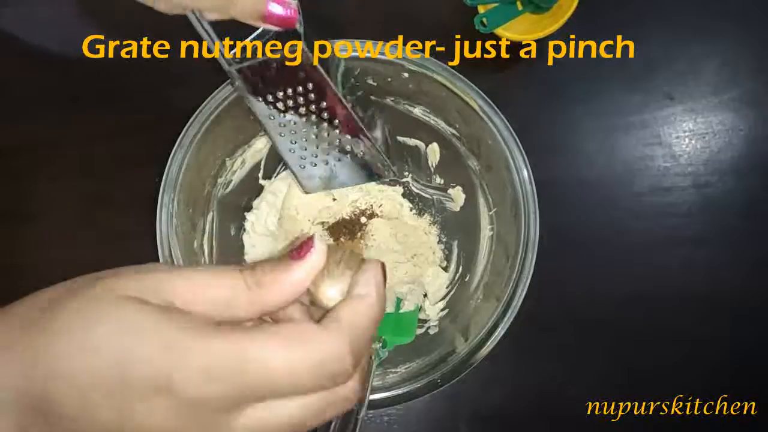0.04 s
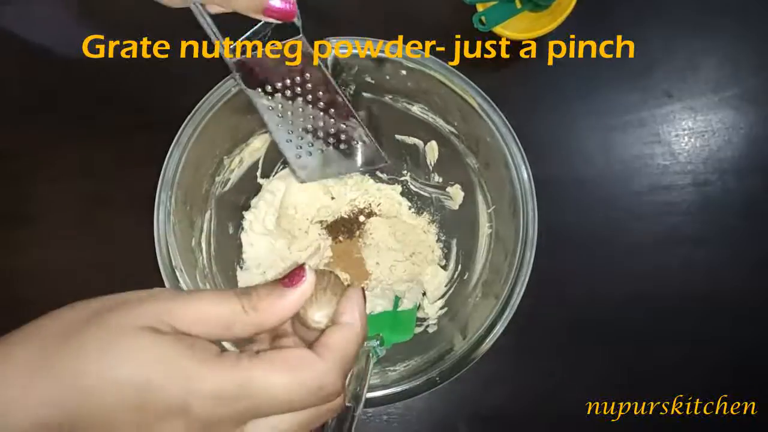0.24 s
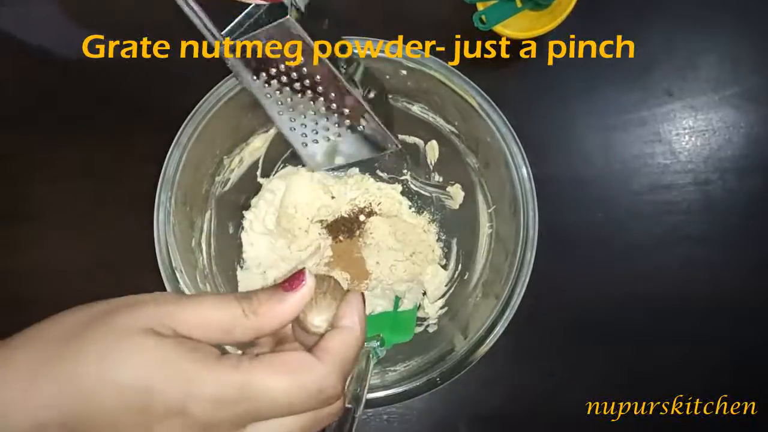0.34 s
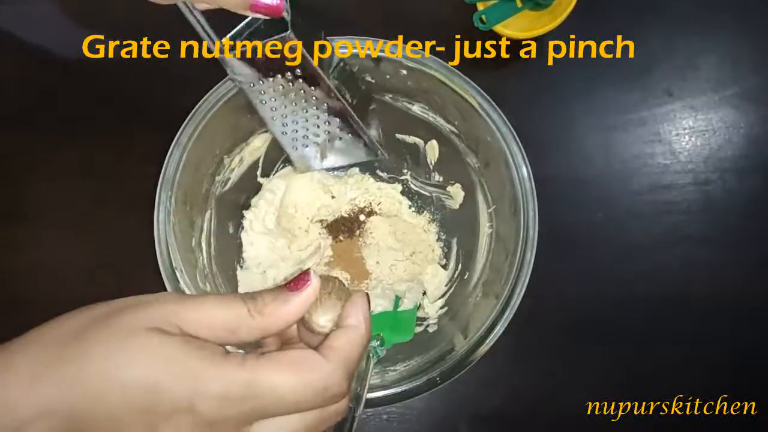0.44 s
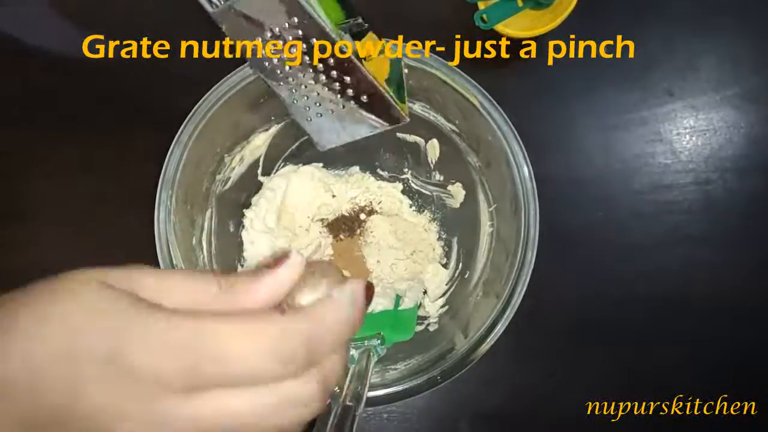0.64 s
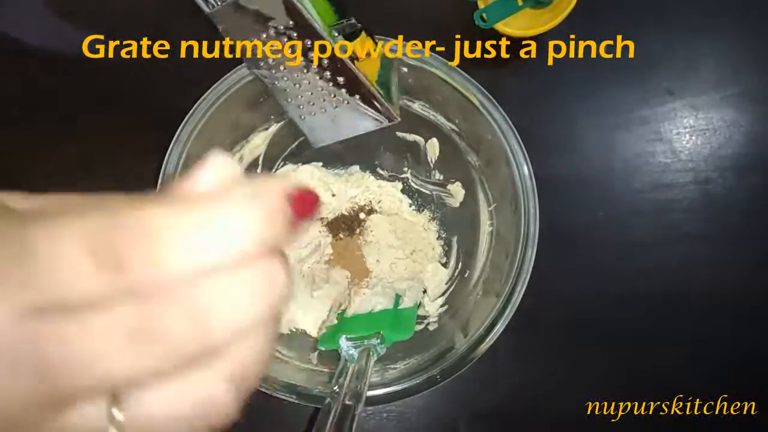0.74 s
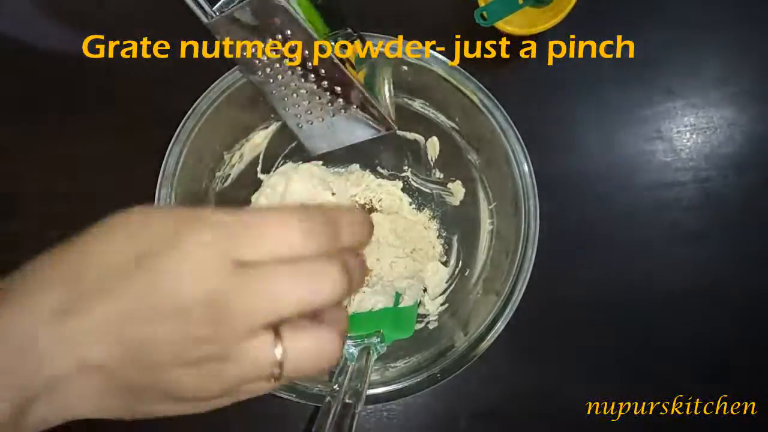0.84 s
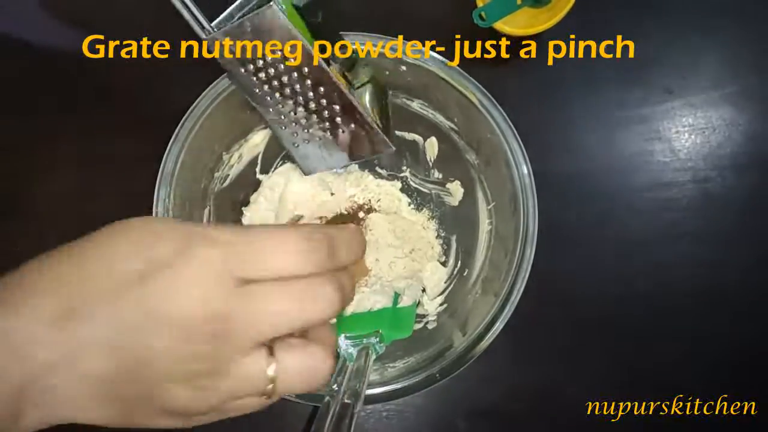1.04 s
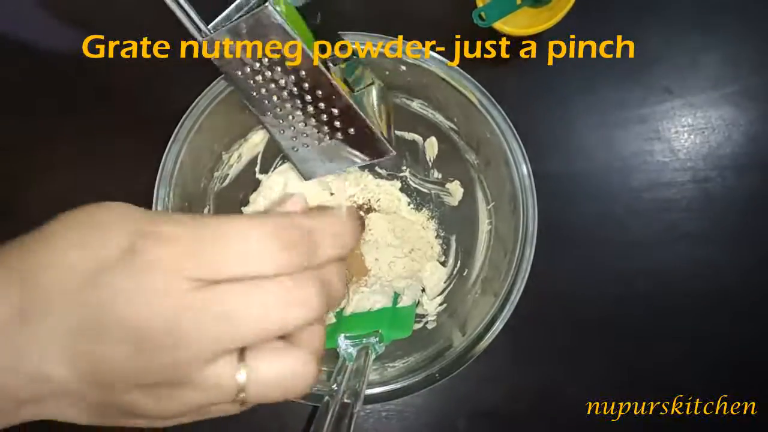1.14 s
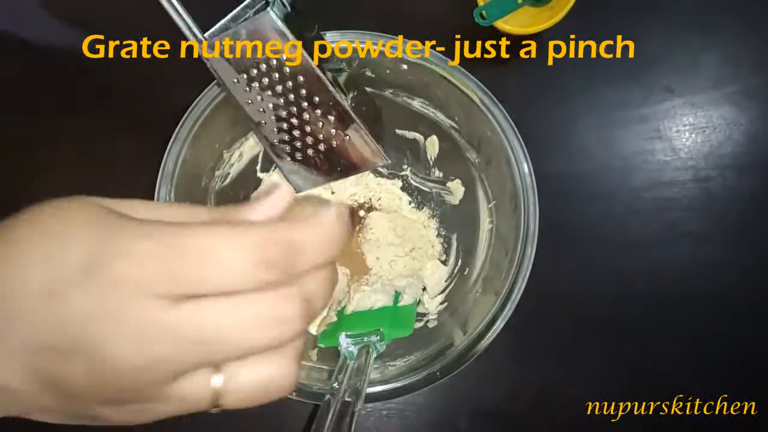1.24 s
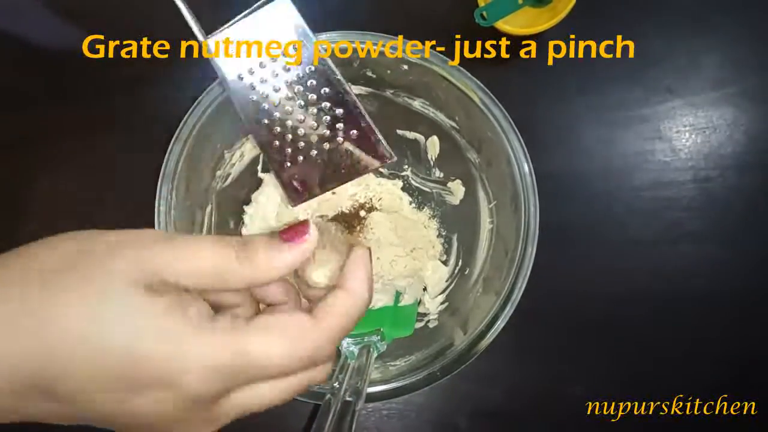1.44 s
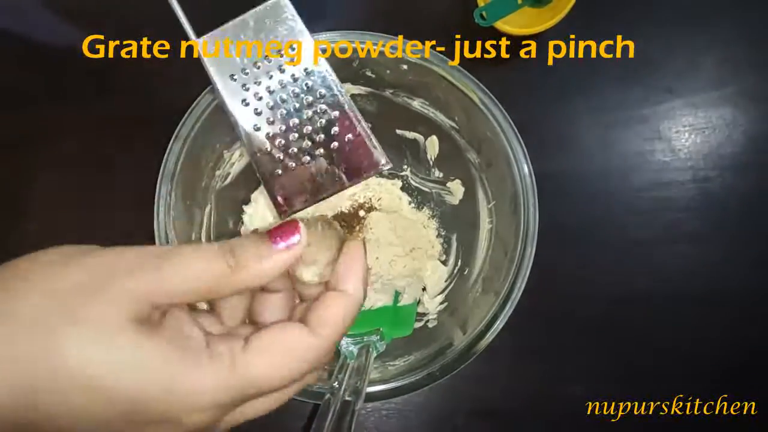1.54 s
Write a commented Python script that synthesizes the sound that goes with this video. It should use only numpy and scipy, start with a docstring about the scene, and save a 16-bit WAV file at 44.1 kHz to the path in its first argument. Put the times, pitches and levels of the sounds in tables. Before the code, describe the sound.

A metal hand grater clinks loudly against a glass bowl rim, which rocks with dull thuds

```python
"""Low rumble, hum and a thin whine run throughout. A steel hand grater taps the rim of a glass mixing
bowl twice, each tap with a quick rebound: noise crack, brief steel modes, longer glass modes, short thump.
The bowl rocks on the table in dull thuds of low modes and scuff noise. A small kitchen answers, mostly
from the left, by one echo and a decaying noise tail. Last, faint rustles: short swells of grainy noise."""
import sys
import numpy as np
from scipy import signal
from scipy.fft import rfft, irfft, next_fast_len
from scipy.io import wavfile
from scipy.ndimage import uniform_filter1d, map_coordinates

SR = 44100
rng = np.random.default_rng(int(sys.argv[2]) if len(sys.argv) > 2 else 0)


def unload_wav(signal):
    """Save mono or channel-first audio to the path in sys.argv[1] as 16-bit WAV at rate SR, clipped to [-1, 1]."""
    wavfile.write(
        sys.argv[1],
        SR,
        np.round(np.clip(np.atleast_2d(signal).T, -1, 1) * 32767).astype(np.int16),
    )


N = 70560  # samples, 1.6 s
LEFT_RIGHT = np.array([[1], [-1]])


def amp(db):
    """Decibels to gain."""
    return 10 ** (np.asarray(db) / 20)


def unit(x):
    """Scales to rms 1."""
    return x / np.sqrt(np.mean(x ** 2) + 1e-20)


def along(points, hz):
    """Interpolates (f/Hz, value) points on a log frequency axis."""
    f, v = np.transpose(points)
    return np.interp(np.log(hz + 1), np.log(f + 1), v)


def leftward(db):
    """Gains of left and right: +db and -db."""
    return amp(LEFT_RIGHT * db)


def since(s):
    """Seconds after time s, zero before it."""
    return np.maximum(np.arange(N) / SR - s, 0)


def filtered(x, response):
    """Multiplies the spectrum of x by a response of frequency."""
    m = next_fast_len(N + SR // 2)
    spectrum = rfft(x, m) * response(np.fft.rfftfreq(m, 1 / SR))
    return irfft(spectrum, m)[..., :N]


def noise(colour, alike):
    """Stereo noise of rms 1; the mid/side balance sets the left-right correlation."""
    def mid_side_gains(hz):
        angle = np.arccos(np.clip(along(alike, hz), -1, 1)) / 2
        return amp(along(colour, hz)) * [np.cos(angle), np.sin(angle)]

    mid, side = filtered(rng.standard_normal((2, N)), mid_side_gains)
    return unit(np.array([mid + side, mid - side]))


# steady noise colour: f/Hz, relative density/dB per Hz
AIR_COLOUR = [(13, -30), (22, 2.5), (54, -0.5), (75, -16.5), (108, -3.5), (123, -10.5), (157, -8),
              (834, -31), (2230, -31), (3590, -38), (4100, -40), (4560, -41.5), (12500, -43.5),
              (16200, -71), (22000, -120)]
# its left-right correlation: f/Hz, correlation
AIR_ALIKE = [(100, 0.99), (400, .85), (1200, 0.13), (8000, 0.04)]
# background lean: f/Hz, level to left/dB (right gets the negative)
AIR_LEFT = [(50, 1.9), (200, 0), (1000, 2), (5000, 5.5), (12000, 0.5)]
# hum and whine before the lean: f/Hz, rms level/dB
HUM = [(49, -63.5), (101, -69.5), (151, -63), (4016, -76), (4317, -83.5)]
AIR_DB = -50  # before the lean


def background():
    """Coloured noise for rumble and hiss; steady sines for mains hum and a thin electrical whine."""
    hum = 0
    for hz, rms_db in HUM:
        turns = hz * since(0) + rng.random()
        hum = hum + np.sqrt(2) * amp(rms_db) * np.sin(2 * np.pi * turns)
    air = amp(AIR_DB) * noise(AIR_COLOUR, AIR_ALIKE)
    return filtered(air + hum, lambda hz: leftward(along(AIR_LEFT, hz)))


BUILD_S = 0.0009  # rise time constant


def burst(s, t60):
    """Envelope: quick exponential rise at time s, exponential fall by 60 dB in t60 seconds."""
    t = since(s)
    return amp(-60 * t / t60) * (1 - np.exp(-t / BUILD_S))


# noise crack of a contact: f/Hz, relative density/dB per Hz
CRACK_COLOUR = [(100, -4), (600, -9.5), (1500, -1), (2800, 4.5), (5200, -2.5), (5700, -7.5), (6150, 2.5),
                (6550, -10), (7000, -3), (7850, -10.5), (8500, -2.5), (10000, -4), (10900, -8),
                (11700, -5.5), (13000, -8.5)]
# left-right correlation of cracks, scuffs and rustles: f/Hz, correlation
CONTACT_ALIKE = [(300, .95), (1000, -0.42), (2000, -0.58), (10000, 0.12)]
CRACK_T60_S, SIZZLE_T60_S, SIZZLE_DB = 0.05, 0.27, -15.5  # sizzle relative to crack


def crack(s):
    """Contact noise: a sharp burst over a weaker, longer sizzle."""
    envelope = burst(s, CRACK_T60_S) + amp(SIZZLE_DB) * burst(s, SIZZLE_T60_S)
    return envelope * noise(CRACK_COLOUR, CONTACT_ALIKE)


SHIMMER_DEPTH, SHIMMER_KNOTS_PER_S, SHIMMER_GROW_S = 0.6, 130, 0.02
SCATTER_DB = 2.47  # standard deviation of a mode's level from strike to strike


def wobble(knots_per_s):
    """Smooth random curve through normally distributed knots."""
    return map_coordinates(rng.standard_normal(2000), [np.arange(N) * knots_per_s / SR])


def ring(modes, s, spot, pitch=1):
    """Damped modes struck at time s; random amplitude and phase flutter sets in as they decay."""
    t = since(s)
    depth = SHIMMER_DEPTH * (1 - np.exp(-t / SHIMMER_GROW_S))
    waves = 0
    for hz, db, t60, spot_db in modes:
        phase = 2 * np.pi * hz * pitch * t
        in_phase = (1 + depth * wobble(SHIMMER_KNOTS_PER_S)) * np.sin(phase)
        quadrature = depth * wobble(SHIMMER_KNOTS_PER_S) * np.cos(phase)
        strike_db = db + spot * spot_db + SCATTER_DB * rng.standard_normal()
        waves = waves + amp(strike_db) * burst(s, t60) * (in_phase + quadrature)
    return waves


# grater modes at spot 0, damped by the hand: f/Hz, mean level/dB, t60/s, gain from spot 0 to 1/dB
STEEL_MODES = [(219, -12.5, 0.16, 3.5), (364, -9.5, 0.15, -7.5), (530.6, -22, 0.16, 6.5),
               (709.3, -7, 0.11, -3), (779, -14.5, .09, 3.5), (1120, -3.5, .11, -1.5), (1697, -9, .08, -1),
               (1907, -16.5, 0.04, -10), (2455, -11.5, 0.043, 1.5), (2637, -1.5, 0.081, 3.5),
               (2662, 3, .09, -9), (3560, -5.5, 0.085, 3), (4090, -18, 0.14, 10), (4840, -8, 0.097, 10),
               (6100, -11, .1, 4), (11770, -9, 0.083, 4.5)]
STEEL_PITCH_SHIFT = -0.012  # share, from spot 0 to spot 1


def steel_sheet(s, spot):
    """Clank of the hand-held sheet; the contact spot shifts mode levels and pitch."""
    return ring(STEEL_MODES, s, spot, 1 + STEEL_PITCH_SHIFT * spot)


# bowl modes, partly split into close pairs: f/Hz, mean level at spot 0/dB, t60/s, gain from spot 0 to 1/dB
GLASS_MODES = [(1708.5, -10, .18, 0), (3110, -1.5, 0.24, 1), (3132, -0.5, 0.2, -4.5), (3212, -8.5, .28, 1),
               (4800, 0, 0.18, -4.5), (4850, -1, 0.2, 3), (4865, -5.5, 0.35, 0.5), (6934, -12.5, .4, -4),
               (6980, -19.5, 0.51, 2), (8880, -21.5, 0.54, 6), (9300, -11, .28, -9),
               (9300, -17.5, 0.33, 1.5), (11270, -15.5, 0.16, 1)]


def glass_bowl(s, spot):
    """Ring of the bowl; close mode pairs beat, the contact spot shifts mode levels."""
    return ring(GLASS_MODES, s, spot)


PUSH_S = 0.00043  # time constant


def push(s):
    """One short mid-pitched thump of the table top under a blow, out and back."""
    u = since(s) / PUSH_S
    return u * (2 - u) * np.exp(-u)


# grater-rim contacts, each tap and its rebound: t/s, glass level/dB, steel level/dB, crack level/dB, spot/0-1
TAPS = [(0.225, -18, -13.5, -7, 0.05), (0.242, -28, -31, -18.5, 0), (0.4206, -24, -17.5, -14.5, 0.81),
        (0.4284, -28.5, -27, -23, 0.8)]
RING_LEFT_DB, RING_LAG_S = 2, 0.000035  # left +dB, right -dB; left later than right
CRACK_LEFT_DB = -0.7
THUMP_DB = -2.5  # relative to steel
SEND_GLASS_DB, SEND_STEEL_DB, SEND_CRACK_DB = -1.5, -10, -3


def tap(s, glass_db, steel_db, crack_db, spot):
    """Steel meets glass: crack, sheet clank, bowl ring and short mid-pitched thump, heard in the kitchen."""
    glass = amp(glass_db) * glass_bowl(s, spot)
    steel = amp(steel_db) * steel_sheet(s, spot)
    snap = amp(crack_db) * crack(s)
    thump = amp(steel_db + THUMP_DB) * push(s)
    ringing = filtered(glass + steel, lambda f: np.exp(-1j * np.pi * f * RING_LAG_S * LEFT_RIGHT))
    direct = ringing * leftward(RING_LEFT_DB) + snap * leftward(CRACK_LEFT_DB) + thump
    send = amp(SEND_GLASS_DB) * glass + amp(SEND_STEEL_DB) * steel + amp(SEND_CRACK_DB) * snap[0] + thump
    return in_kitchen(direct, send)


# tail decay: f/Hz, t60/s
ROOM_T60 = [(100, 0.42), (300, .65), (1000, 0.75), (2500, 0.77), (5000, 0.68), (9000, .52), (12000, 0.46)]
# tail colour: f/Hz, gain/dB
ROOM_COLOUR = [(80, -1.5), (250, 1), (700, -1.5), (1100, -7.5), (1900, -4), (2700, -7.5), (3300, -7),
               (5000, -7.5), (7000, -9), (9500, -6.5), (12000, -8.5)]
# tail lean: f/Hz, level to left/dB (right gets the negative)
ROOM_LEFT = [(200, 0.44), (800, 2.5), (2000, 4.5), (6000, 4.5), (12000, 4)]
# tail left-right correlation: f/Hz, correlation
ROOM_ALIKE = [(200, .95), (600, 1), (1500, 0), (10000, 0.012)]
WALL_S, WALL_DB, WALL_LOWPASS_HZ = 0.0165, -16.5, 6000  # echo off the nearest surface
ROOM_DELAY_S, ROOM_RISE_S = 0.0014, 0.0018


def in_kitchen(x, send):
    """Direct sound, one dulled wall echo, and the mono send convolved with a decaying noise tail."""
    white = noise([(20, 0), (20000, 0)], ROOM_ALIKE)
    hz, t, bins = signal.stft(white, SR, nperseg=256)
    decay = amp(-60 * t / along(ROOM_T60, hz)[:, None])
    tail = signal.istft(bins * decay, SR, nperseg=256)[1][:, :N]
    tail = tail * (1 - np.exp(-since(ROOM_DELAY_S) / ROOM_RISE_S))
    tail = filtered(unit(tail) / np.sqrt(N),
                    lambda f: amp(along(ROOM_COLOUR, f)) * leftward(along(ROOM_LEFT, f)))
    wall = filtered(x, lambda f: np.exp(-2j * np.pi * f * WALL_S) / (1 + 1j * f / WALL_LOWPASS_HZ))
    diffuse = signal.fftconvolve(send[None], tail, axes=1)[:, :N]
    return x + amp(WALL_DB) * wall + diffuse


# knocks of the rocking bowl: t/s, level/dB
THUDS = [(0.277, -34.5), (0.2928, -18.5), (0.2967, -18), (0.332, -27), (0.348, -23), (0.371, -40),
         (0.393, -28.5), (.428, -34), (.492, -34.5)]
# table modes: f/Hz, level/dB, t60/s
TABLE_MODES = [(122.5, -11.5, 0.14), (156, -19, 0.05), (219, -11.5, 0.072), (282, -1.5, 0.056),
               (307.6, -2, .05), (373.6, -10.5, 0.11), (482.6, -11.5, 0.073), (690, -18, 0.027)]
# scuff noise: f/Hz, relative density/dB per Hz
SCUFF_COLOUR = [(40, -23.5), (130, 7), (300, 1.5), (800, -8), (1400, -10), (3000, -24.5)]
SCUFF_DB, SCUFF_T60_S = -6.5, 0.089  # level relative to the thud
SEND_THUD_DB = -4.5


def rocking():
    """The bowl's foot knocks damped table modes and scuffs as it rocks."""
    knock = sum(amp(db) * burst(0, t60) * np.sin(2 * np.pi * hz * since(0)) for hz, db, t60 in TABLE_MODES)
    knocks = sum(amp(db) * np.interp(since(s), since(0), knock) for s, db in THUDS)
    scuff_envelope = sum(amp(db + SCUFF_DB) * burst(s, SCUFF_T60_S) for s, db in THUDS)
    foot = knocks + scuff_envelope * noise(SCUFF_COLOUR, CONTACT_ALIKE)
    return in_kitchen(foot, amp(SEND_THUD_DB) * foot[0])


# rustles of nutmeg and fingers: middle t/s, Gaussian width/s, level before the lean/dB
RUSTLES = [(.874, 0.0053, -68), (0.893, 0.0078, -68), (1.18, 0.028, -74.5), (1.47, 0.024, -72)]
# rustle noise: f/Hz, relative density/dB per Hz
RUSTLE_COLOUR = [(2000, -17), (5000, -10.5), (7500, 6), (9500, 0), (12000, -23)]
RUSTLE_GRAIN_DB, RUSTLE_LEFT_DB = 3, 7.5  # rms grain; left +dB, right -dB


def rustles():
    """Short dry brushes: noise with random level grain under Gaussian swells."""
    t = np.arange(N) / SR
    swell = sum(amp(db) * np.exp(-0.5 * ((t - s) / width) ** 2) for s, width, db in RUSTLES)
    smooth = uniform_filter1d(rng.standard_normal(N), size=60)
    grain = amp(RUSTLE_GRAIN_DB * unit(smooth))
    brush = unit(grain * noise(RUSTLE_COLOUR, CONTACT_ALIKE))
    return swell * brush * leftward(RUSTLE_LEFT_DB)


def scene():
    """Sum of all sources, left and right."""
    return background() + rustles() + rocking() + sum(tap(*row) for row in TAPS)


CLIP_LEVEL, TOP_HZ = 0.92, 12450


def record(dry):
    """Hard clip near full scale, then a steep low-pass at the band limit."""
    clipped = np.clip(dry, -CLIP_LEVEL, CLIP_LEVEL)
    return filtered(clipped, lambda hz: 1 / np.sqrt(1 + (hz / TOP_HZ) ** 200))


dry = scene()
out = record(dry)
unload_wav(out)
```